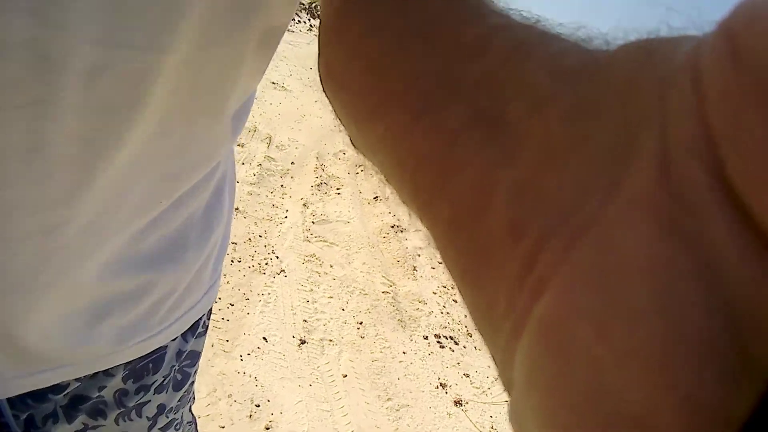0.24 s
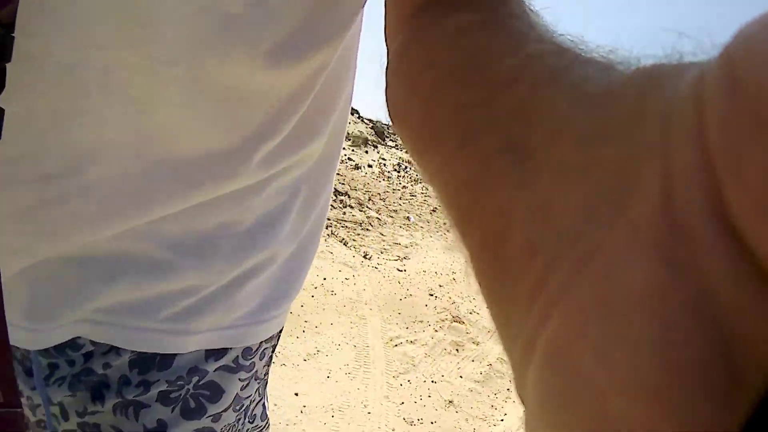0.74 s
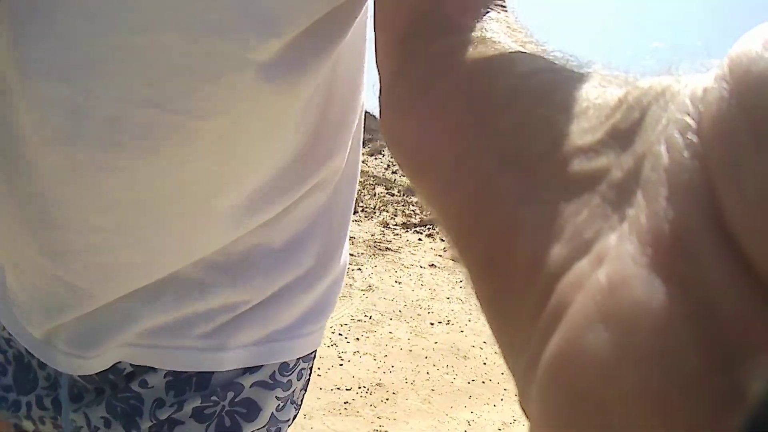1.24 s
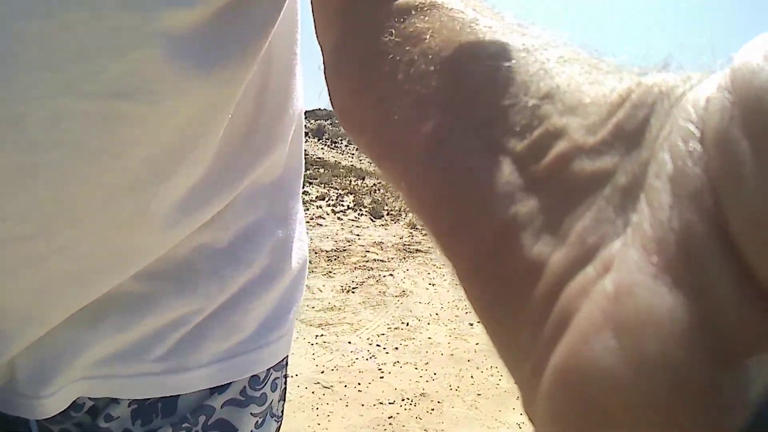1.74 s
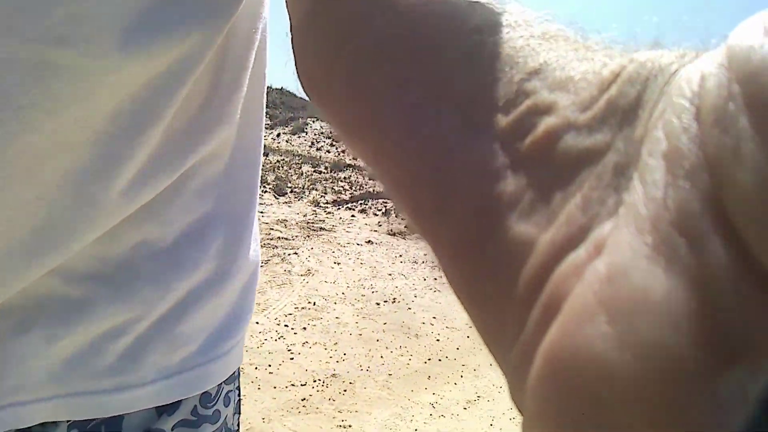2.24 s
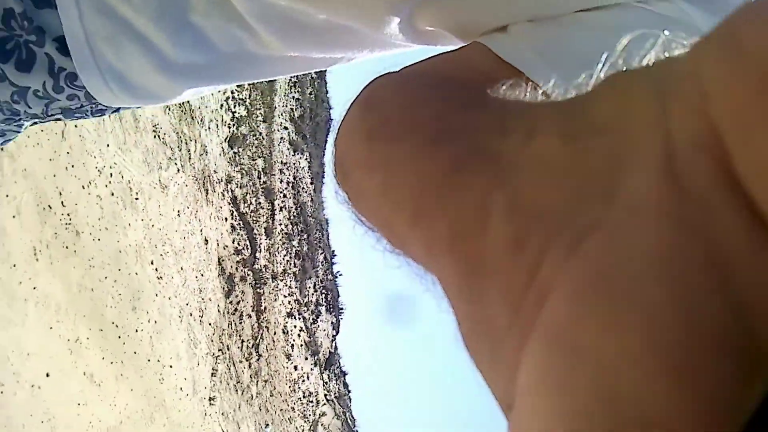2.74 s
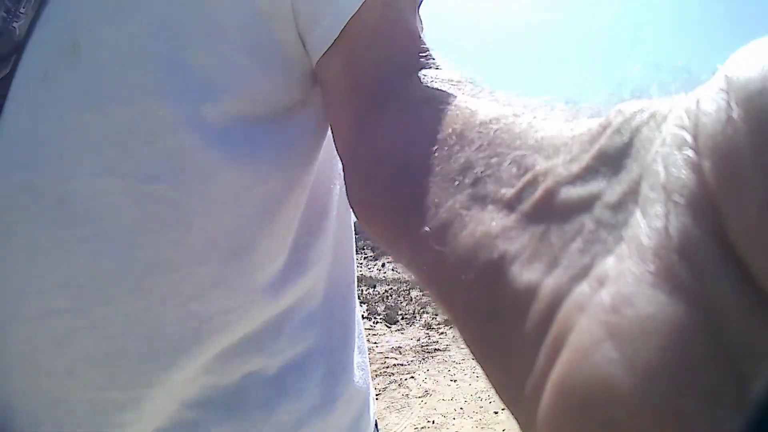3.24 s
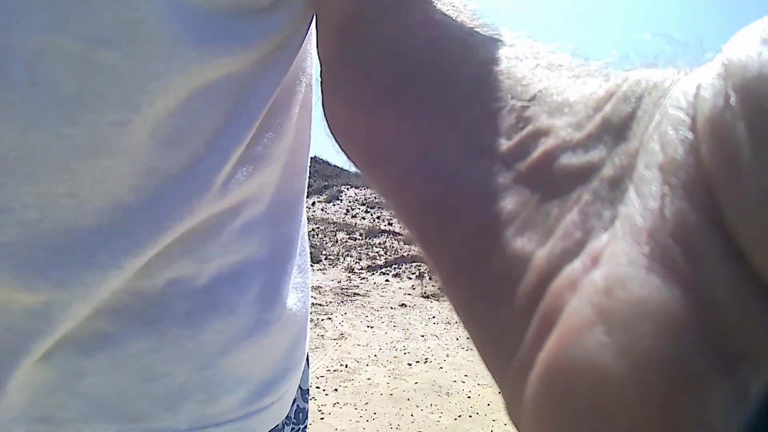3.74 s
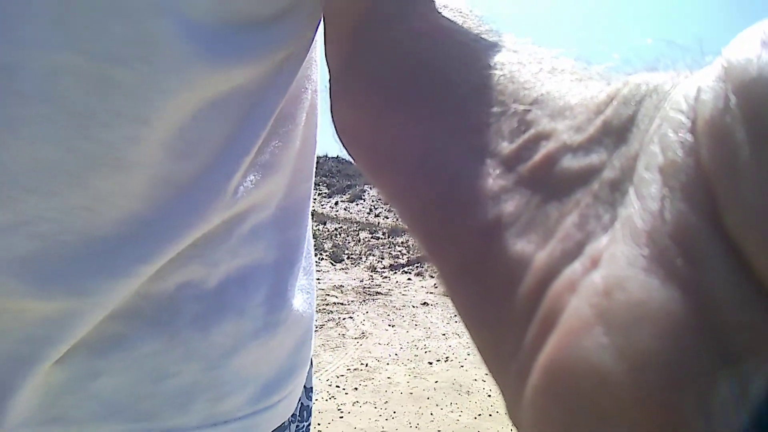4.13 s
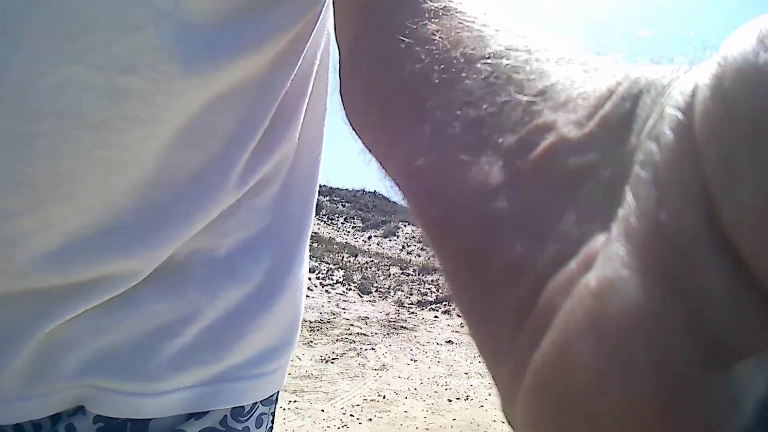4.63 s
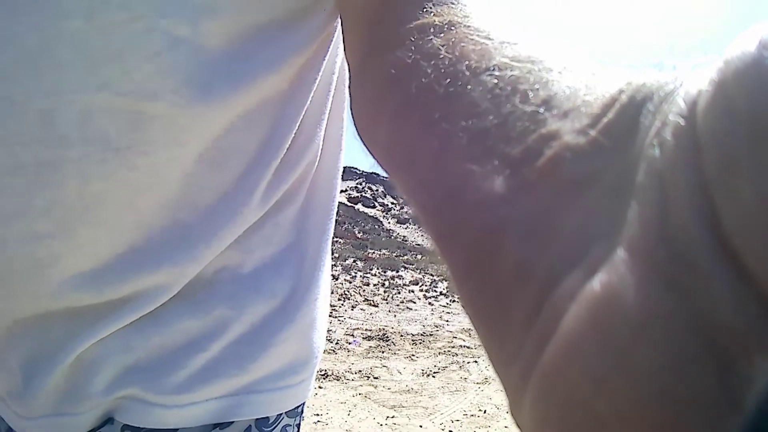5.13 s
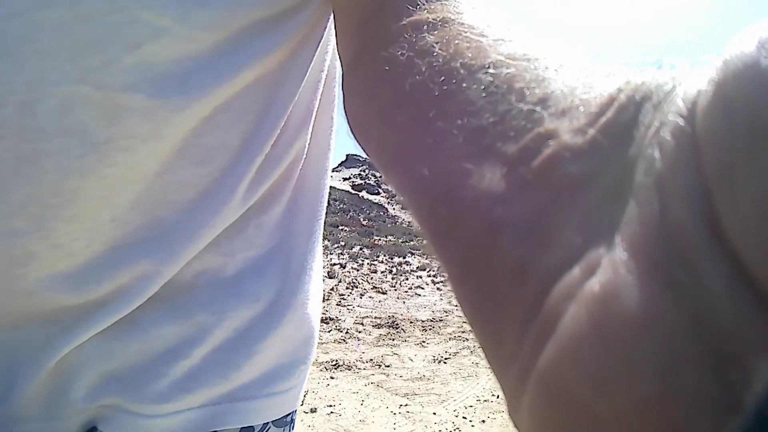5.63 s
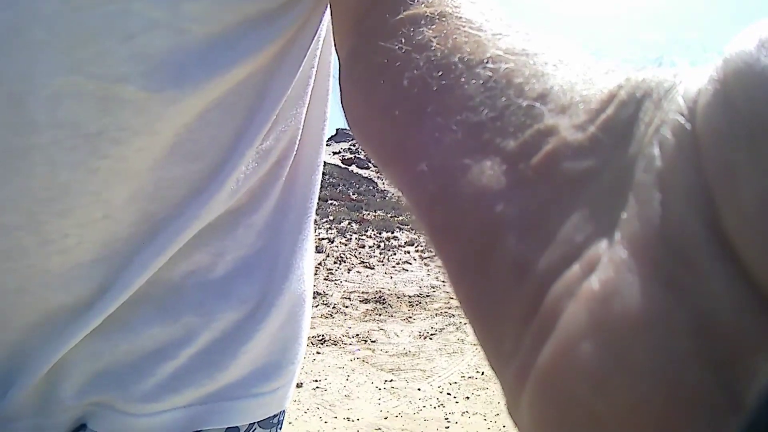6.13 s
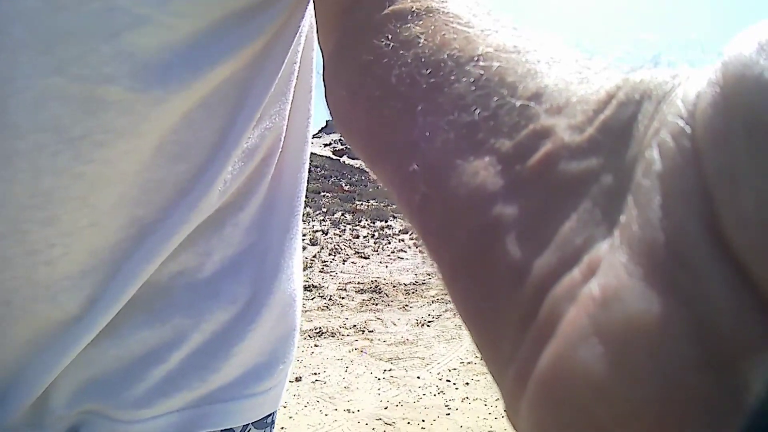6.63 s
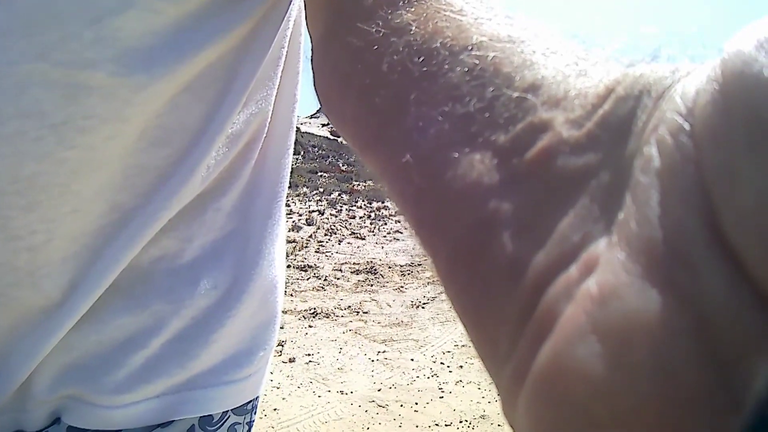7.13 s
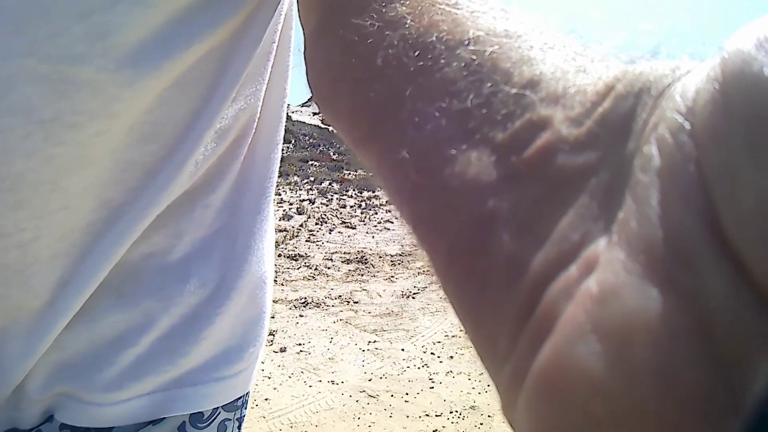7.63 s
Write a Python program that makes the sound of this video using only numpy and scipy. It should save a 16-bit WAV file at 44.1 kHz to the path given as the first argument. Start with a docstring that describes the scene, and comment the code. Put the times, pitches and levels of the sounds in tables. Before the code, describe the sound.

Quiet open air with handling bumps, then small electric propellers stutter, rev, coast down and surge into a distorted, buzzing full-throttle drone.

```python
"""Two propellers of a hand-held electric model aircraft, heard by a small camera on the frame.
Each is a sum of shaft harmonics; the motors jerk, rev briefly, coast down, then go to full throttle.
The second turns slightly faster than the first, and the blades chop noise shaped as turbulent air.
Fingers rub and knock the frame as noise ringing its modes; a squeal rises as a rotor catches.
Over open air, the sum saturates the microphone input and is mirrored by slow sampling.
"""
import sys
import numpy as np
from scipy import signal
from scipy.fft import rfft, irfft, next_fast_len
from scipy.io import wavfile
from scipy.ndimage import uniform_filter1d

SR = 44100
rng = np.random.default_rng(int(sys.argv[2]) if len(sys.argv) > 2 else 0)


def generate_wav(sig):
    """Save sig (samples, or channels by samples) to the path in sys.argv[1] as 16-bit PCM at SR."""
    pcm = np.round(np.clip(np.atleast_2d(sig).T, -1, 1) * 32767).astype(np.int16)
    wavfile.write(sys.argv[1], SR, pcm)


N = 347067
TIME = np.arange(N) / SR  # s
FULL_HZ = 330  # reference shaft speed at full throttle

# modes of the airframe, lowest first: (frequency [Hz], bandwidth [Hz], gain [dB])
FRAME_MODES = [(253, 12.6, -21), (432, 120, 8), (793, 220, 20), (1357, 370, 13.5), (2160, 140, -8),
               (3000, 700, -33), (3650, 200, -33)]


def amp(db):
    """Decibel law: an amplitude factor grows tenfold every 20 dB."""
    return np.exp(np.asarray(db) * np.log(10) / 20)


def unit(x):
    """Power normalisation: scales a signal to an rms of 1."""
    return x / np.sqrt(np.mean(x ** 2) + 1e-20)


def on_log_axis(points, hz):
    """Logarithmic interpolation: reads a table of (frequency [Hz], value) along octaves."""
    f, value = np.transpose(points)
    return np.interp(np.log(hz + 1), np.log(f + 1), value)


def curves(rows):
    """Linear interpolation: draws each column of a (time [s], ...) table over the whole time."""
    s, *columns = np.transpose(rows)
    return [np.interp(TIME, s, column) for column in columns]


def coloured(points):
    """Spectral shaping: white noise weighted along frequency, then brought to an rms of 1."""
    size = next_fast_len(N, True)
    weight = amp(on_log_axis(points, np.fft.rfftfreq(size, 1 / SR)))
    spectrum = rfft(rng.standard_normal(size)) * weight
    return unit(irfft(spectrum, size)[:N])


def wander(rate_hz):
    """Band-limited chance: random knots joined by lines, of rms about 1, up to about this rate."""
    knots = rng.standard_normal(int(TIME[-1] * 2 * rate_hz) + 2)
    joined = np.interp(TIME * 2 * rate_hz, np.arange(len(knots)), knots)
    return joined * np.sqrt(3 / 2)  # the lines between knots lose a third of the power


def add(mix, s, sound):
    """Superposition: adds a sound into the mix from time s [s]."""
    part = mix[max(round(s * SR), 0):][:len(sound)]
    part += sound[:len(part)]


def ring(x, modes):
    """Modal resonance: an excitation drives parallel resonators, whose outputs add."""
    out = 0
    for hz, width, db in modes:
        out = out + amp(db) * signal.lfilter(*signal.iirpeak(hz, hz / width, SR), x)
    return out


def open_air():
    """Broadband ambient noise: a stationary random pressure with a fixed spectrum."""
    # spectrum of the open air: (frequency [Hz], relative spectral level [dB])
    air_spectrum = [(20, -12.5), (30, 7.5), (60, 2), (200, -3.5), (600, -15), (1400, -15.5), (1900, -25.5),
                    (2250, -25), (2450, -34), (3100, -31.5), (4000, -39.5)]
    level_db = -52  # rms
    return amp(level_db) * coloured(air_spectrum)


def rubbing(shudder_db=-2, scrape_db=-8, slips_per_s=2500, spread_db=3):
    """Stick-slip friction: many tiny random slips ring the frame, over a low shudder."""
    # rubbing of the hand, then of the starting motor, as two lists:
    # (time [s], low shudder before its trim [dB], scrape before its trim [dB])
    rubs = [
        [(0.0, -34, -54), (0.098, -41, -52), (0.14, -44, -24), (0.202, -42, -43), (0.328, -37, -40),
         (0.342, -43, -39), (0.358, -36, -57), (0.382, -42, -51), (0.436, -47, -40), (0.48, -58, -60)],
        [(1.69, -56, -34), (1.72, -31, -46), (1.746, -27, -29), (1.792, -22.5, -57), (1.848, -40, -45),
         (1.88, -40, -50)],
    ]
    # spectrum of the hand's shudder: (frequency [Hz], relative spectral level [dB])
    shudder_spectrum = [(18, -23), (30, -2), (97, -6), (140, -6), (227, -9), (265, 4), (309, -16),
                        (500, -20), (650, -52), (1100, -120)]

    strength = rng.standard_normal(N) * amp(spread_db * np.minimum(rng.exponential(1, N), 3))
    slips = strength * (rng.random(N) < slips_per_s / SR)
    scrape = unit(ring(slips, FRAME_MODES))
    hand_shudder = coloured(shudder_spectrum)
    motor_shudder = unit(ring(slips, FRAME_MODES[:1]))  # the lowest mode alone

    out = np.zeros(N)
    for rows, shudder in zip(rubs, (hand_shudder, motor_shudder)):
        low_db, high_db = curves(rows)
        inside = 1. * (TIME >= rows[0][0]) * (TIME <= rows[-1][0])
        touching = uniform_filter1d(inside, size=400)  # softens both ends
        out += touching * amp(low_db + shudder_db) * shudder
        out += touching * amp(high_db + scrape_db) * scrape
    return out


def contacts(rows, ring_db, soft_hz=300, top_hz=4000):
    """Impact excitation: a gritty push rings the frame; a longer one swings the lowest mode more."""
    out, t = np.zeros(N), np.arange(8192) / SR
    hz = np.fft.rfftfreq(len(t), 1 / SR)
    octaves = np.log2(np.minimum(hz, top_hz) + soft_hz)  # soft_hz flattens the tilt in the bass
    boom_hz, boom_width, _ = FRAME_MODES[0]
    boom = np.sin(2 * np.pi * boom_hz * t) * np.exp(-np.pi * boom_width * t)
    for s, peak_db, tilt_db, fade in rows:
        push = rng.standard_normal(len(t)) * np.exp(-t / max(fade, 1 / 2000))
        spectrum = rfft(ring(push, FRAME_MODES[1:]))
        spectrum = spectrum * amp(tilt_db * octaves) * (hz < top_hz)
        click = irfft(spectrum) * (1 - t / t[-1])
        swing = amp(ring_db) * fade / .01  # ring_db holds for a push of 10 ms
        add(out, s, amp(peak_db) * (click / abs(click).max() + swing * boom))
    return out


def finger_knocks():
    """Impact excitation: fingers strike the frame, with a weak swing of its lowest mode."""
    # (time [s], peak of the click [dB], treble tilt [dB per octave], 1/e fade, at least 0.0005 [s])
    knock_rows = [(0.120, -30, -9, .004), (0.13, -24, -7, 0.0044), (0.139, -16.5, 1.5, 0.0043),
                  (0.153, -20, -7, 0.0093), (0.163, -24, -3, .0045), (0.176, -24.5, -6, 0.017),
                  (0.222, -27.5, 0, .0078), (0.26, -27.5, -7, 0.0073), (0.298, -36, -4, .005),
                  (0.313, -26.5, -3, 0.0059), (0.338, -19, -13, 0.0091), (0.410, -28.5, 1, 0.00078),
                  (0.431, -37, -3, 0.016), (0.880, -38, -4, 0.0017), (1.026, -39.5, 3, 0.0056),
                  (1.464, -36, -6, 0.011), (2.713, -18, -3, .002), (2.825, -24, -8, .002)]
    return contacts(knock_rows, ring_db=-22.5)


def motor_jerks():
    """Torque reaction: the motors jerk the frame before they catch, swinging its lowest mode more."""
    # (time [s], peak of the click [dB], treble tilt [dB per octave], 1/e fade, at least 0.0005 [s])
    jerk_rows = [(1.550, -27, -7, 0.015), (1.585, -15, -7.5, 0.0093), (1.605, -18.5, -6, 0.031),
                 (1.629, -19, 1.5, .0052), (1.673, -23.5, -7, 0.0055), (1.708, -21.5, -8.5, 0.0075),
                 (1.725, -19, -8, 0.02), (1.748, -17, -6, 0.025), (1.770, -18, -8, 0.013),
                 (1.784, -15.5, -5, 0.0047), (1.799, -16.5, -8.5, .007)]
    return contacts(jerk_rows, ring_db=-14)


def squeal(octave_db=-9):
    """Gliding two-partial tone: the windings squeal upward, with the octave, as the rotor catches."""
    # (time [s], frequency of the lower partial [Hz], its peak level [dB])
    glide = [(1.765, 600, -67), (1.785, 748, -27), (1.80, 980, -29), (1.812, 1110, -33)]
    hz, db = curves(glide)
    angle = 2 * np.pi * np.cumsum(hz) / SR
    sounding = (TIME > glide[0][0]) * (TIME < glide[-1][0])
    return sounding * amp(db) * (np.sin(angle) + amp(octave_db) * np.sin(2 * angle))


def shaft_speed():
    """Rotor dynamics: a short rev, a coast against air drag, and a run-up that levels off."""
    # shaft speed in the short rev, until the throttle is cut: (time [s], speed [Hz])
    rev = [(1.85, 97), (2.0, 168), (2.1, 208), (2.22, 245), (2.3, 264), (2.34, 262), (2.38, 254),
           (2.45, 230), (2.5, 188)]
    # top speed that the battery allows: (time [s], speed [Hz])
    top_speed = [(3.2, 333), (3.5, 331), (3.62, 329.2), (4.75, 330), (5.05, 329.2), (5.4, 327.5),
                 (5.85, 328.7), (6.85, 328.8), (7.3, 327.4), (7.87, 326.7)]
    drag = .0218  # s per s: one turn takes this much longer every second of coasting
    open_s, open_hz, rise_s = 3.02, 106, .0955  # at full throttle: a factor e in each rise time

    cut_s, cut_hz = rev[-1]
    coast = 1 / (1 / cut_hz + drag * np.maximum(TIME - cut_s, 0))
    rising = open_hz * np.exp(np.clip((TIME - open_s) / rise_s, -10, 10))
    run_up = (rising ** -6 + curves(top_speed)[0] ** -6) ** (-1 / 6)  # a smooth minimum of the two
    return np.maximum(np.where(TIME < cut_s, curves(rev)[0], coast), run_up)


def tones(speed_hz, full, count=20, third_db=13, fifth_db=6):
    """Blade loading and transfer: each order grows with speed and load, coloured by the airframe."""
    # how strongly the airframe passes a tone to the microphone: (frequency [Hz], gain [dB])
    transfer = [(90, -7), (180, -1.5), (280, 1), (450, 0.5), (680, 0.5), (1000, 3.5), (1300, -3),
                (1560, -3), (2000, -14), (2650, -19), (3300, -27.5), (4000, -27), (6500, -24.5)]
    # narrow frame resonance, lit by passing tones at part throttle:
    # (frequency [Hz], half width [Hz], gain [dB])
    boom_hz, boom_width, boom_db = (287, 24, 8.7)
    # under full load, order 2, the blade tone: (time [s], extra level [dB])
    blade_level = [(3.2, 13), (3.47, 12), (3.6, 9), (4.9, 9), (5.45, 9), (6.0, 8.5), (6.35, 7), (6.87, 7.5),
                   (7.02, 2), (7.15, 6), (7.87, 7.5)]
    # under full load, order 4, its octave: (time [s], extra level [dB])
    octave_level = [(3.2, 8), (3.92, 2), (4.06, -4), (4.3, 9.5), (4.6, 6), (5.8, 6), (6.15, 5.5), (7.25, 7),
                    (7.5, 1), (7.87, 3)]
    # under full load, order 6, the upper whine: (time [s], extra level [dB])
    whine_level = [(3.2, 4.5), (4.1, 2), (5.4, 9), (5.8, 9.5), (7.15, 8.5), (7.5, 5.5)]
    base_db, db_per_octave = -14, 15.5  # at full speed, and per octave of speed
    odd_db = -19.5  # odd orders above the first are weak: the two blades are nearly alike
    load_hum_db, load_even_db, load_odd_db = 5, 4.5, -7  # unbalance hum, higher even and odd orders
    stalled_db, biting_db, onset = -8, 4, 4.2  # dB, dB, octaves per s at which both set in
    thin_db, thin_from_hz, thin_to_hz = 5.5, 2700, 3200  # brighter top at part throttle

    octaves = np.log2(speed_hz / FULL_HZ)
    # blades stall while they speed up and bite cleanly while they slow down
    stall = np.tanh(uniform_filter1d(np.gradient(octaves, TIME), size=3000) / onset)
    overtone_db = np.interp(stall, [-1, 0, 1], [biting_db, 0, stalled_db])
    # extra dB of single orders at part throttle and under full load
    light = {1: 0, 2: 0, 3: third_db, 5: fifth_db}
    load = {1: load_hum_db, 2: curves(blade_level)[0],
            4: curves(octave_level)[0], 6: curves(whine_level)[0]}

    orders = []
    for k in [*range(1, count // 2, 2), *range(2, count, 2)]:
        odd, hz = k > 1 and k % 2, k * speed_hz
        load_db = load.get(k, load_odd_db if odd else load_even_db)
        light_db = light.get(k, overtone_db) + boom_db / (1 + ((hz - boom_hz) / boom_width) ** 2)
        light_db += np.interp(hz, [thin_from_hz, thin_to_hz], [0, thin_db])
        level_db = base_db + db_per_octave * octaves + on_log_axis(transfer, hz) + odd * odd_db
        orders.append((k, level_db + full * load_db + (1 - full) * light_db))
    return orders


def propeller(speed_hz, orders, full, jitter=0.054, flutter=0.092, drift_db=0.57,
              lag=0.036, part_lag=0.248):
    """Rotor harmonics: suction pulses lock to the shaft; uneven inflow shakes timing and strength."""
    angle = 2 * np.pi * np.cumsum(speed_hz) / SR + jitter * wander(45)
    out = np.zeros(N)
    for k, db in orders:
        # higher orders flutter more
        strength = amp(db + drift_db * wander(4)) * (1 + flutter * min(k, 8) / 2 * wander(35))
        # phase shift on the way through the frame; lightly loaded blades give blunter pulses
        shift = lag * k * (k - 1) + part_lag * (1 - full) * min(k, 10) ** 2
        out -= strength * np.cos(k * angle + shift)
    return np.sqrt(2) * out


def blade_wash(speed_hz, full, chop=0.21, gust_db=2.0):
    """Turbulence noise: random flow off the blades, modulated at the two-blade passing rate."""
    # spectrum of the turbulent air: (frequency [Hz], relative spectral level [dB])
    wash_spectrum = [(20, -3), (45, -21), (100, -9), (180, -12.5), (260, -8), (400, -8), (850, -2.5),
                     (1150, -5.5), (1550, -7.5), (1850, -8.5), (2200, -10.5), (2480, -14.5), (2800, -18),
                     (3200, -17), (3500, -23.5), (3800, -24), (4400, -44)]
    base_db, db_per_octave = -21, 6  # at steady full speed, and per octave of speed
    part_db = -2.5  # softer at part throttle
    stall_db = 3.5  # louder while the blades speed up by an octave in a tenth of a second

    octaves = np.log2(speed_hz / FULL_HZ)
    strokes = 1 + chop * np.cos(2 * 2 * np.pi * np.cumsum(speed_hz) / SR)
    speeding_up = np.maximum(np.gradient(octaves, TIME), 0) / 10  # octaves per tenth of a second
    speeding_up = uniform_filter1d(speeding_up, size=2000)
    level_db = base_db + db_per_octave * octaves + part_db * (1 - full) + stall_db * speeding_up
    return coloured(wash_spectrum) * strokes * amp(level_db + gust_db * wander(40))


def motors(second_unbalance_db=-12, load_from_hz=255):
    """Beating of detuned rotors: two propellers at a fixed speed ratio, with their turbulence."""
    second_ratio = 1.0456  # the shared battery holds both rotors at one ratio
    second_part_db, second_full_db = -10.5, -15  # second rotor's trim at part and full throttle
    second_dull_db = 5.5  # dB per octave: its overtones fall away faster at full throttle

    speed_hz = shaft_speed()
    full = np.interp(speed_hz, [load_from_hz, FULL_HZ - 10], [0, 1])  # 0 part, 1 full throttle
    orders = tones(speed_hz, full)
    leading = propeller(speed_hz, orders, full)

    # the second rotor is better balanced: a weaker hum, at 0.91 of its speed, and even orders only
    second_orders = [(0.91, orders[0][1] + second_unbalance_db)]
    for k, db in orders:
        if k % 2 == 0:
            second_orders.append((k, db - second_dull_db * full * np.log2(k / 2)))
    second_db = second_part_db * (1 - full) + second_full_db * full
    trailing = amp(second_db) * propeller(speed_hz * second_ratio, second_orders, full)

    fade_in = np.interp(TIME, [1.78, 1.86], [0, 1])
    return (leading + trailing + blade_wash(speed_hz, full)) * fade_in


def scene():
    """Superposition: open air, handling, starting noises and motors add as pressures."""
    handling = rubbing() + finger_knocks()
    starting = motor_jerks() + squeal()
    return (open_air() + handling + starting + motors())[None]


def low_pass(x, hz, size):
    """Linear-phase filtering: a windowed-sinc kernel removes what lies above hz."""
    kernel = signal.firwin(size, hz, window=("kaiser", 9), fs=SR)
    return signal.oaconvolve(x, kernel[None], "same")


def record(dry, ceiling=0.68, knee=8, output_ceiling=0.68, grit=0.049, grit_hz=900,
           input_hz=4300, filter_hz=4050, mirror_db=-3):
    """Saturation and aliasing: the input overloads, slow sampling mirrors the top, the output clips."""
    camera_hz, edge_hz = 8000, 15800  # sampling rate of the camera; final low-pass
    saturated = dry / (1 + abs(dry / ceiling) ** knee) ** (1 / knee)
    ragged = saturated * (1 + grit * wander(grit_hz))  # uneven peaks make the overload crackle
    # a carrier at the sampling rate folds each tone f to camera_hz - f
    carrier = 1 + 2 * amp(mirror_db) * np.cos(2 * np.pi * camera_hz * TIME)
    sampled = low_pass(ragged, input_hz, size=201) * carrier
    narrow = low_pass(sampled, filter_hz, size=301)
    clipped = np.clip(narrow, -output_ceiling, output_ceiling)  # the filter's overshoot clips again
    return low_pass(clipped, edge_hz, size=511)


dry = scene()
out = record(dry)
generate_wav(out)
```